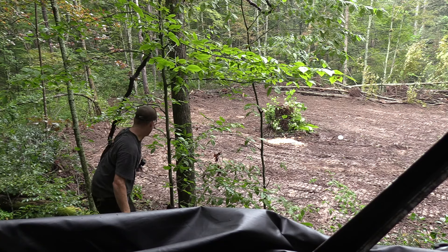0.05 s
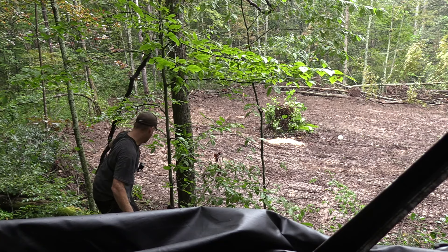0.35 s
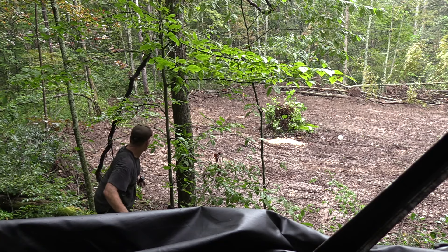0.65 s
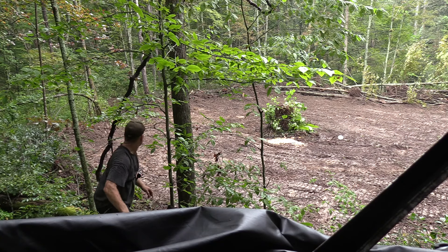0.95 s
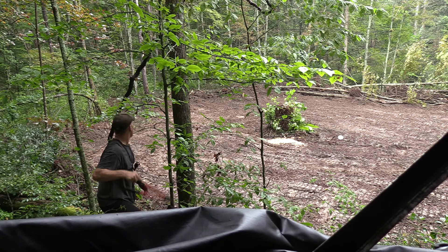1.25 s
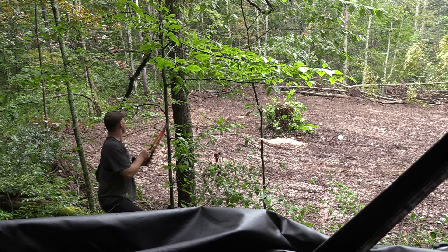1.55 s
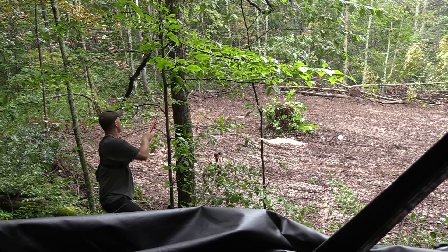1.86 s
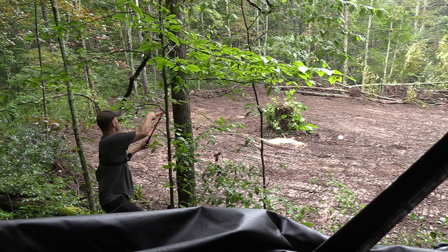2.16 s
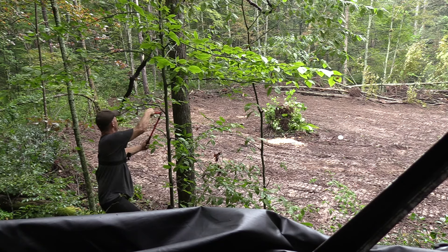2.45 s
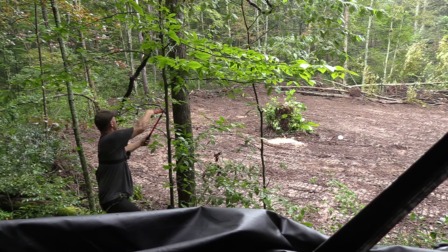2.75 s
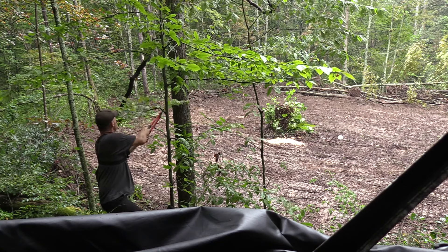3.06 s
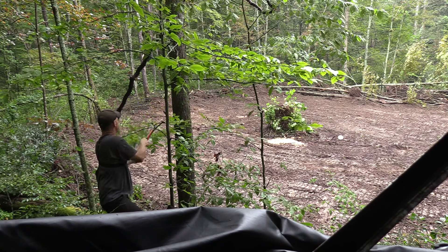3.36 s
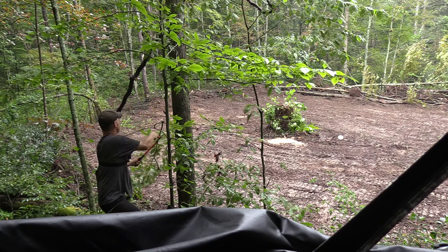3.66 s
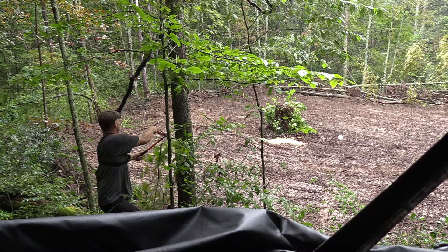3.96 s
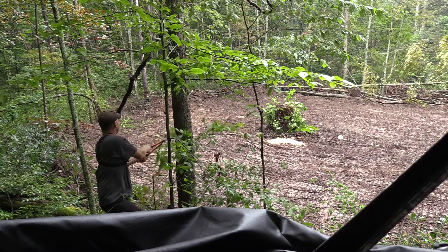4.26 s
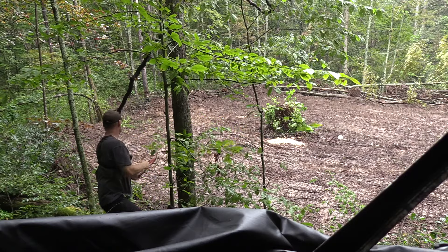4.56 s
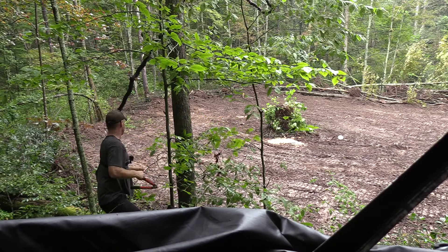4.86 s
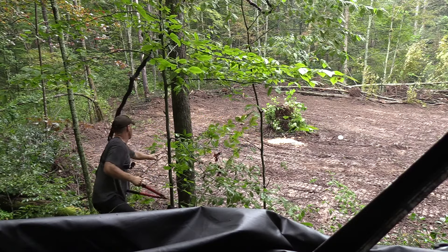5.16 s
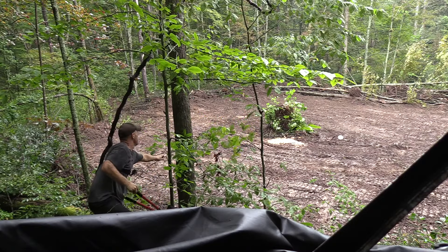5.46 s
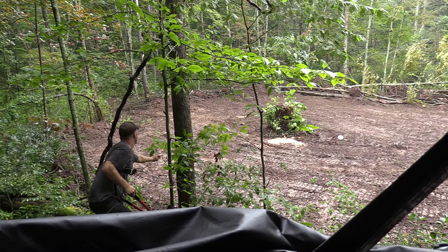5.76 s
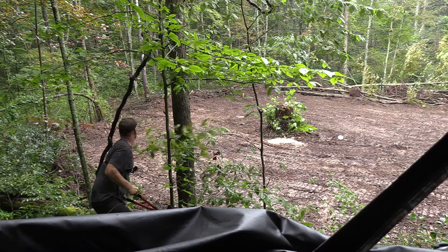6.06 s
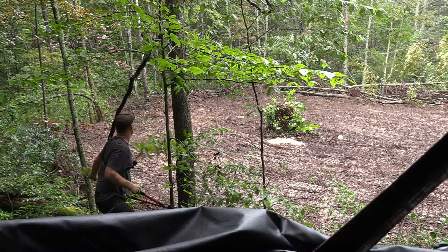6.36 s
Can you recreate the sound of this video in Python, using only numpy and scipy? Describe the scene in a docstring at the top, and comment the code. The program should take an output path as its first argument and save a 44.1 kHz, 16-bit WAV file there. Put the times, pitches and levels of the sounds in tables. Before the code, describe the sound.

Footsteps crack twigs in a forest, then loppers cut two branches with sharp snaps and foliage rustles, over droning insects.

```python
"""At a forest edge, insects drone near 6 kHz over the soft hush of air in the trees.
A man steps over twigs, which crack as his boots thud on the soft ground. He cuts two green
branches with hand loppers and drags them through the brush, where leaves rub and crackle.
Each cut is a run of tearing fibres and one hard snap, echoed by the ground and the trunks."""
import sys
import numpy as np
from scipy import signal
from scipy.fft import rfft, irfft, next_fast_len
from scipy.io import wavfile
from scipy.ndimage import map_coordinates

SR = 44100
rng = np.random.default_rng(int(sys.argv[2]) if len(sys.argv) > 2 else 0)


def store_pcm(level_fs):
    """Save levels as 16-bit WAV."""
    pcm = np.round(np.clip(level_fs, -1, 1) * 32767).astype(np.int16)
    wavfile.write(sys.argv[1], SR, np.atleast_2d(pcm).T)


N = 282632


def amp(db):
    """Turn decibels into a number to multiply a sound by."""
    return 10 ** (np.asarray(db) / 20)


def unit(x):
    """Scale a sound to an average (rms) size of 1."""
    return x / np.sqrt(np.mean(x ** 2) + 1e-20)


def along(points, hz):
    """Read between the rows of a (frequency, value) table, on a log frequency scale."""
    f, values = np.transpose(points)
    return np.interp(np.log(hz + 1), np.log(f + 1), values)


def wobble(rate):
    """A smooth curve through `rate` random values a second."""
    knots = rng.standard_normal(int(N * rate / SR) + 4)
    return map_coordinates(knots, [np.arange(N) * rate / SR])


def filtered(x, response):
    """Change the tone of a sound: multiply each frequency f by response(f)."""
    n = x.shape[-1]
    padded = next_fast_len(n + 8192)
    return irfft(rfft(x, padded) * response(np.fft.rfftfreq(padded, 1 / SR)), padded)[..., :n]


def resonance(f, hz, q):
    """Keep the frequencies near hz; a higher q rings longer."""
    return 1j * f * hz / q / (hz * hz - f * f + 1j * f * hz / q)


def lowpass(f, hz):
    """Soften the treble above hz."""
    return hz * hz / (hz * hz - f * f + 1j * f * hz * np.sqrt(2))


def highpass(f, hz):
    """Soften the bass below hz."""
    return -(f / hz) ** 2 * lowpass(f, hz)


def add(track, start, sound):
    """Mix a sound into the track at `start` seconds."""
    part = track[..., round(start * SR):][..., :sound.shape[-1]]
    part += sound[..., :part.shape[-1]]


# How wide the forest sounds: (frequency [Hz], side compared with middle [dB])
STEREO_WIDTH = [(60, -11), (160, -9), (450, -8.5), (740, 1), (1200, -3), (2000, -6), (3500, -1.5),
                (5500, -2), (9000, -4), (15000, -5.5)]
def spread(pair, spectrum, side_db):
    """Give two noises a tone; one fills the middle, the other adds left-right width."""
    mid, side = filtered(pair, lambda f: amp(along(spectrum, f)))
    side = filtered(side, lambda f: amp(along(STEREO_WIDTH, f) + side_db))
    return unit(np.array([mid + side, mid - side]))


# The tone of air in the trees: (frequency [Hz], relative level [dB])
HUSH_TONE = [(20, -14), (45, -14), (80, -5.5), (160, 0), (260, 2.5), (500, 3.5), (1000, 3), (2000, 2.5),
             (3200, -3.5), (4800, -10.5), (7500, -17.5), (11000, -25), (13000, -28), (16000, -29)]
def woods():
    """Air in the far trees makes an even hush."""
    gain = amp(-49.5 + 0.3 * wobble(5.3))
    return gain * spread(rng.standard_normal((2, N)), HUSH_TONE, side_db=1.5)


# The tone of the insect chorus: (frequency [Hz], relative level [dB])
INSECT_TONE = [(4000, -52), (5100, -14.5), (5550, -7), (5850, -1.5), (6130, 0.5), (6330, -1), (6600, -7),
               (7000, -18), (8200, -47)]
def insects():
    """Many distant callers blur into one high, faintly shimmering drone."""
    gain = amp(-49.5 + 0.24 * wobble(14) + 1.0 * wobble(70))
    return gain * spread(rng.standard_normal((2, N)), INSECT_TONE, side_db=-0.5)


def crackle(rate, scatter_db, rub_db):
    """Two streams of tiny leaf taps, about `rate` a second, over smooth rubbing."""
    size = rng.standard_normal((2, N)) * amp(scatter_db * np.clip(rng.standard_normal((2, N)), -2, 2))
    taps = unit(size * (rng.random((2, N)) < rate / SR))
    return taps + amp(rub_db) * rng.standard_normal((2, N))


# A leafy bough is brushed, dropped or dragged:
# (time at full speed [s], hold [s], level [dB], rise [s], fall [s], leaves compared with bough [dB])
SWISH_MOVES = [(0.34, 0.014, -56, 0.044, 0.064, 0.5), (0.592, .02, -54, .06, .45, -2),
               (3.106, .01, -39, 0.07, 0.19, -14), (3.294, 0.14, -51, 1, 2, -6.5),
               (3.96, .09, -44, 0.12, 0.22, -6), (4.139, 0.092, -43, 0.077, .2, -2.5),
               (4.233, .11, -42, 0.14, 0.6, -2.5), (4.762, .02, -47, 0.075, 0.26, 0.5),
               (4.947, .02, -50.5, 0.26, 1.2, -10), (5.931, 0.039, -47.5, 0.21, 0.24, -4.5),
               (6.045, 0.14, -41, 0.055, 0.17, -3.5), (6.23, 0.11, -38.5, 0.14, .2, -2.5),
               (6.397, .02, -38, 0.096, .2, -11)]
def swishing(range_db=23.5):
    """Loudness curves for boughs and leaves: a swish gains range_db in its rise, loses it in its fall."""
    t = np.arange(N) / SR
    bough_power, leaf_power = amp(-59) ** 2, amp(-63) ** 2  # foliage is never quite at rest
    for time, hold, db, rise, fall, leaf_db in SWISH_MOVES:
        away = np.maximum(np.maximum((time - t) / rise, (t - time - hold) / fall), 0)
        power = amp(db - range_db * away) ** 2
        bough_power += power
        leaf_power += power * amp(leaf_db) ** 2
    return np.sqrt(bough_power), np.sqrt(leaf_power)


# The tones of sweeping boughs and of crisp leaf edges: (frequency [Hz], relative level [dB])
BOUGH_TONE = [(60, -21), (160, -8), (300, -5.5), (750, -0.5), (1300, -0.5), (2200, 1.5), (3400, 0.5),
              (4600, -2), (7000, -11), (11000, -21), (16000, -45)]
LEAF_TONE = [(1500, -18), (4000, 0.5), (7500, 0), (10000, -4), (12300, -8), (14000, -15.5), (16000, -23)]
def brush():
    """Boughs sweep past each other in uneven tugs while their leaves crackle and fine stems flick."""
    bough_gain, leaf_gain = swishing()
    tugs = wobble(35)
    rubbing = spread(crackle(rate=1800, scatter_db=1.0, rub_db=6), BOUGH_TONE, side_db=-8.5)
    boughs = bough_gain * amp(1.3 * tugs) * rubbing
    flutter = wobble(160)
    rustle = spread(crackle(rate=3500, scatter_db=4.5, rub_db=4.5), LEAF_TONE, side_db=-2.5)
    leaves = leaf_gain * amp(tugs + 1.3 * flutter) * rustle
    flicks = crackle(rate=130, scatter_db=1.6, rub_db=-30)
    flicks = filtered(flicks, lambda f: resonance(f, hz=3200, q=2.5))
    stems = bough_gain * amp(-5) * spread(flicks, BOUGH_TONE, side_db=-2)
    return (boughs + leaves + stems) * amp([[0.5], [-0.5]])  # a little to the left


def fracture(t, crumble):
    """Fibres give way: one clean click if `crumble` (seconds) is short, a swarm of them if long."""
    age = 4 * t / max(crumble, 1e-4)
    fibres = rng.standard_normal(len(t)) * (rng.random(len(t)) < 0.3) * age * np.exp(-age)
    fibres *= crumble / 0.0013 / (np.linalg.norm(fibres) + 1e-9)
    fibres[0] = -1  # the first fibre breaks
    return fibres / np.linalg.norm(fibres)


# Boots press into soft ground: (time [s], strength [dB], pitch [Hz], settling time [s])
FOOTFALLS = [(.569, -16.5, 206, .04), (0.656, -14, 237, 0.0038), (1.3675, -14.5, 345, 0.00089),
             (2.167, -25, 201, .021), (2.632, -24, 240, .027), (3.486, -22.5, 336, 0.017),
             (4.43, -16.5, 242, 0.2), (4.806, -18, 330, .044)]
def steps():
    """Fallen leaves give under a boot with a short, dull thud."""
    out, t = np.zeros(N), np.arange(SR // 4) / SR
    for time, db, hz, settle in FOOTFALLS:
        crunch = fracture(t, settle)
        thud = filtered(crunch, lambda f: resonance(f, hz, q=1.4) * highpass(f, 135) * lowpass(f, 700))
        add(out, time, amp(db) * thud / np.linalg.norm(thud))
    return out


# How long the echo lasts among the trunks: (frequency [Hz], time to fade by 60 dB [s])
TRUNK_FADE = [(200, 0.067), (2000, 0.092), (5000, 0.12), (12000, 0.18)]
def forest_echo(sound, gap, early_db, far_db):
    """Nearby stems echo weakly for `gap` seconds, then the ground and trunks, then the deeper woods."""
    hz, t, noise = signal.stft(rng.standard_normal((2, SR // 2)), SR, nperseg=256)
    decay = amp(-60 * t / along(TRUNK_FADE, hz)[:, None]) + amp(far_db - 60 * t / 0.77)
    mid, side = signal.istft(noise * decay, SR, nperseg=256)[1]
    tail = np.array([mid + 0.29 * side, mid - 0.82 * side])
    tail *= np.where(np.arange(len(mid)) / SR < gap, amp(early_db), 1)
    return signal.fftconvolve(sound[None], tail / np.linalg.norm(tail[0]), axes=1)[:, :len(sound)]


def twig(db, hz, q, crumble, echo_db, pan_db):
    """Dry wood breaks with a very short ring; thinner twigs sound higher and brighter."""
    clean_top, crumbly_top = 1.96, 4.2  # the treble fades above these multiples of the pitch
    top = crumbly_top + (clean_top - crumbly_top) * np.exp(-crumble / 0.0023)
    fibres = fracture(np.arange(SR // 2) / SR, crumble)
    crack = filtered(fibres, lambda f: resonance(f, hz, q) * lowpass(f, top * hz))
    crack *= amp(db + 6.5) / np.linalg.norm(crack)
    echo = forest_echo(crack, gap=0.0073, early_db=-6, far_db=-52)
    return crack * amp([[pan_db / 2], [-pan_db / 2]]) + amp(echo_db) * echo


# Twigs and dry leaves crack, near and far:
# (time [s], strength [dB], pitch [Hz], ringing [q], crumbling time [s], echo [dB], left over right [dB])
TWIG_CRACKS = [(0.81, -14.5, 2230, 0.76, 0.0099, -2, 3.5), (1.0225, -20, 3880, 2.3, .0053, -7, 6),
               (1.12, -29.5, 1400, 0.82, 0.009, -10, -2), (1.3677, -7, 1930, 0.5, 0.00019, 0, 3.5),
               (1.555, -22.5, 1480, 1.1, .036, -3, 1), (1.676, -28, 1500, .9, 0.019, -2, 6),
               (1.879, -16.5, 1670, 0.76, 0.0051, 0, 2), (2.0004, -22, 1950, 0.75, 0.0068, -3, 0),
               (2.231, -27.5, 1400, .7, 0.023, -1, 0), (2.34, -30.5, 2200, .7, .0003, -10, 0),
               (2.44, -27, 2500, 0.91, 0.025, -2, 6), (2.635, -20.5, 2460, 0.69, 0.019, 2.5, 10),
               (3.084, -25, 2500, 0.65, 0.0023, -3, 4), (3.291, -21, 2220, 1.4, 0.0057, 1, 2),
               (3.769, -29, 7000, 1.1, .002, -3, 2), (4.266, -18, 3300, 1.7, 0.0033, -2, 6),
               (4.53, -23, 3500, 2, 0.005, -4, 3), (5.1027, -24.5, 1880, 0.7, 0.0034, 0, -2),
               (5.3098, -22, 2200, 1.5, 0.0026, -10, 7), (5.5933, -19, 1130, 2.8, 0.000096, -23, -10),
               (5.7793, -16.5, 1300, 0.66, 0.00021, -8, 3.5), (6.146, -29, 3000, 2.4, 0.0026, -5, -5),
               (6.25, -21, 3000, 1.4, .0053, -11, 0), (6.279, -19, 810, 8.3, 0.022, -19, 0),
               (6.349, -20, 3060, 2.2, 0.0031, 0, 3)]
def twigs(ticks_per_s=3):
    """Clear cracks among faint chance ticks; their highest treble and deepest bass are softened."""
    out = np.zeros((2, N))
    for time, *shape in TWIG_CRACKS:
        add(out, time, twig(*shape))
    ticks = rng.uniform(-1, 1, (int(ticks_per_s * N / SR), 3))  # in the fallen leaves
    for slot, (delay, size, thinness) in enumerate(ticks):
        hz = 2100 * 2 ** (thinness / 2)
        tick = twig(db=-31 + 5 * size, hz=hz, q=2.0, crumble=0.0067, echo_db=-2, pan_db=0)
        add(out, (slot + abs(delay)) / ticks_per_s, tick)
    return filtered(out, lambda f: highpass(f, 129) * lowpass(f, 13700) ** 2)


# The notes a green branch rings with: (base pitch [Hz], relative level [dB], time to fade by 60 dB [s])
BRANCH_NOTES = [(2120, 1, 0.0073), (2760, 6.5, 0.0029), (3410, -5, 0.0063)]
def branch_break(db, pitch_ratio, splinter_db):
    """One break rings the branch briefly and throws splinters."""
    t = np.arange(SR // 2) / SR
    ring = -sum(amp(level - 60 * t / fade) * np.sin(2 * np.pi * hz * pitch_ratio * t)
                for hz, level, fade in BRANCH_NOTES)
    ring *= 1 - np.exp(-t / 0.00023)  # a very quick fade-in
    ring = filtered(ring, lambda f: resonance(f, hz=2500, q=1.0))  # a thin branch gives off little bass
    splinters = filtered(fracture(t, crumble=0.004),
                         lambda f: resonance(f, 2140, q=0.51) * highpass(f, 695) * lowpass(f, 9700) ** 2)
    return amp(db) * (ring / abs(ring).max() + amp(splinter_db) * splinters / abs(splinters).max())


# The blade goes through each branch in two breaks, a crack and then a snap:
# (snap time [s], snap level [dB], crack comes earlier by [s], crack compared with snap [dB])
BRANCH_CUTS = [(3.1373, -3.5, .0188, -10.5), (4.2455, -8.5, .026, -11)]
def loppers(tear_lead_s=0.0088, tear_boost_db=9.5):
    """Fibres tear, the branch cracks half-way, then snaps off; the forest echoes each stage."""
    out, t = np.zeros((2, N)), np.arange(SR // 2) / SR
    for time, db, lead, crack_db in BRANCH_CUTS:
        fibres = fracture(t, crumble=0.024)
        tear = filtered(fibres, lambda f: resonance(f, hz=1990, q=0.87) * lowpass(f, 6000))
        tear = amp(db + crack_db + tear_boost_db) * tear / np.linalg.norm(tear)
        crack = branch_break(db + crack_db, pitch_ratio=1.25, splinter_db=-3)  # half cut, still stiff
        snap = branch_break(db, pitch_ratio=1.0, splinter_db=-15)  # freed, it rings lower and cleaner
        for start, sound in [(time - lead - tear_lead_s, tear), (time - lead, crack), (time, snap)]:
            echo = forest_echo(sound, gap=0.015, early_db=-10.5, far_db=-30)
            add(out, start, sound * amp([[1], [-1]]) + amp(-3.5) * echo)
            add(out, start + 0.011, amp(-11) * sound)  # the bounce off the ground
    return out


def scene():
    """The work in the brush over the steady forest."""
    return loppers() + twigs() + steps() + brush() + insects() + woods()


def record(dry, top_hz=15850):
    """Remove the very highest treble, everything above top_hz."""
    return filtered(dry, lambda f: f < top_hz)


dry = scene()
out = record(dry)
store_pcm(out)
```